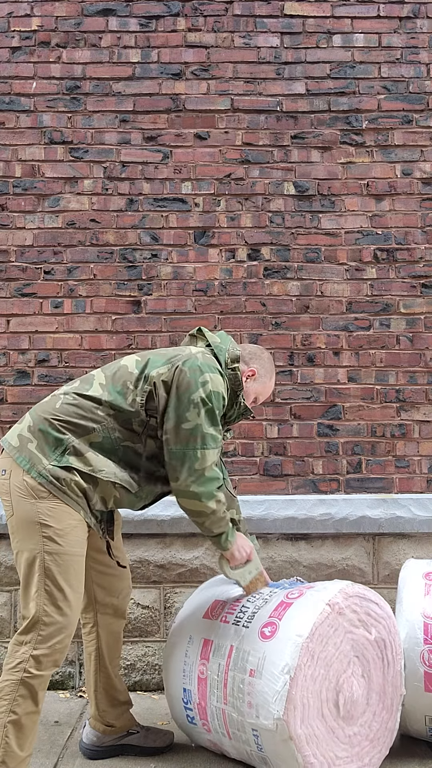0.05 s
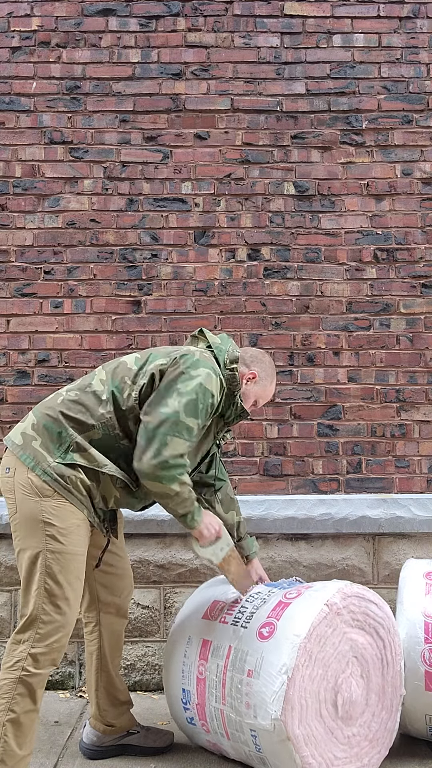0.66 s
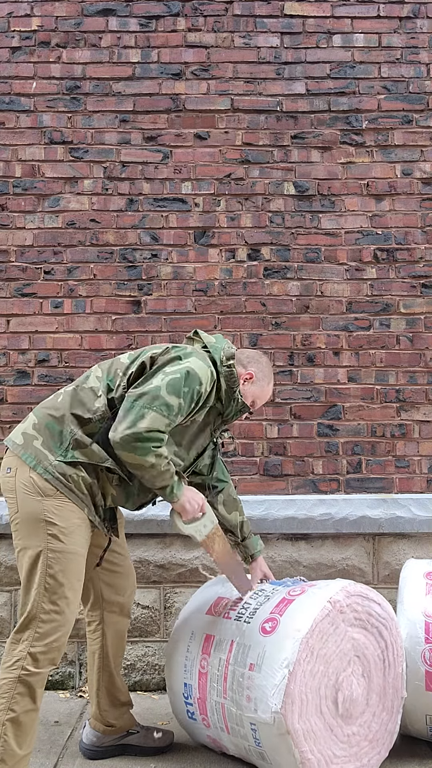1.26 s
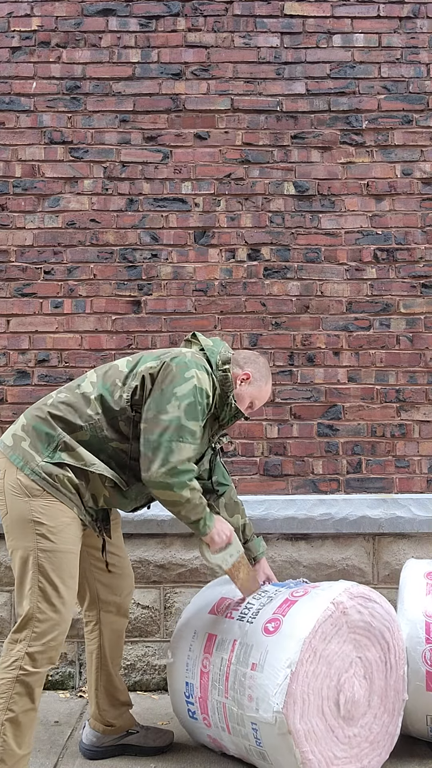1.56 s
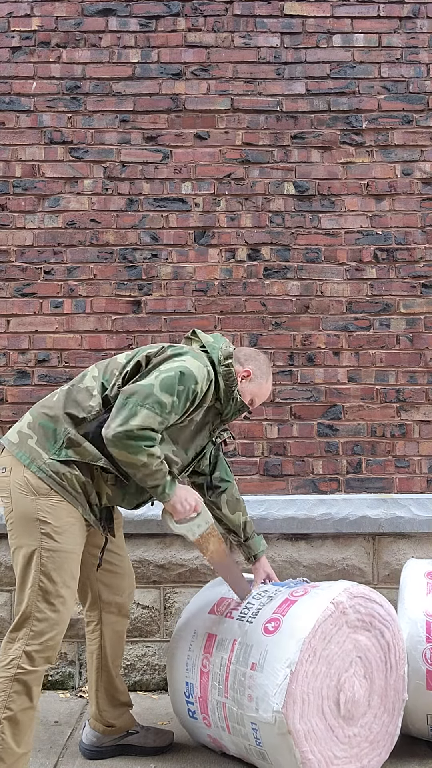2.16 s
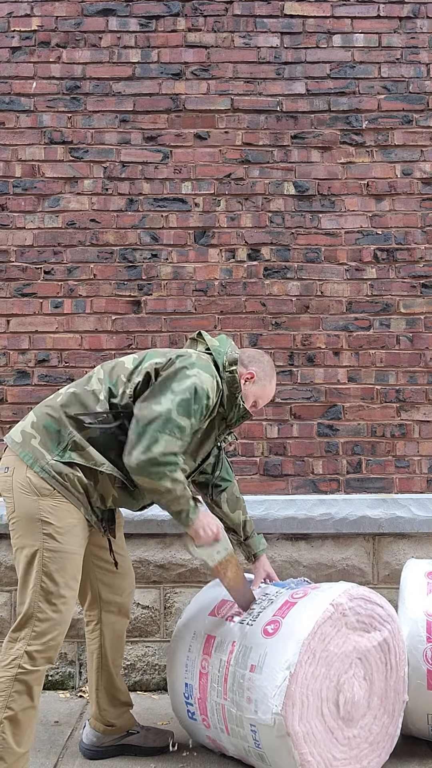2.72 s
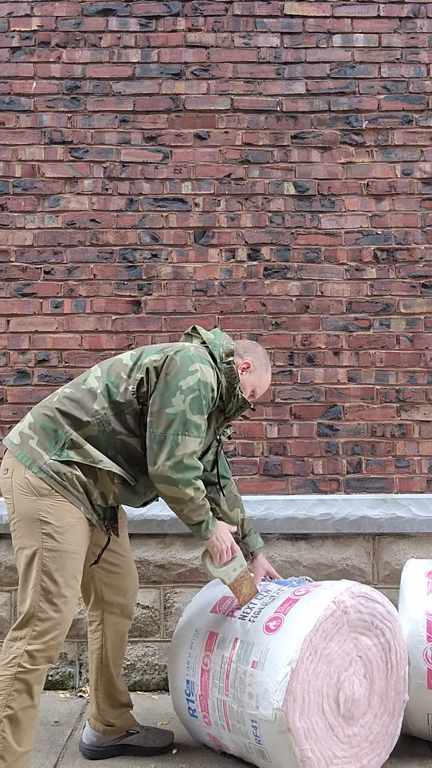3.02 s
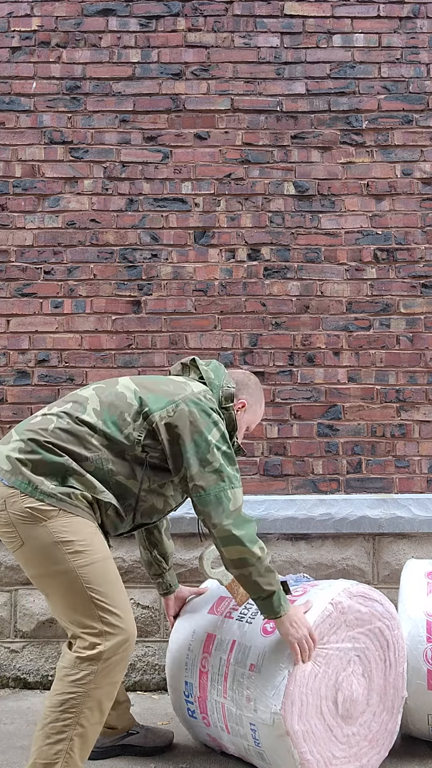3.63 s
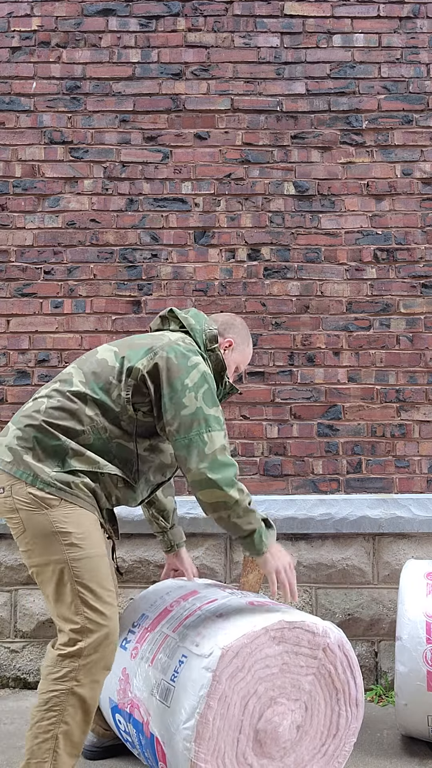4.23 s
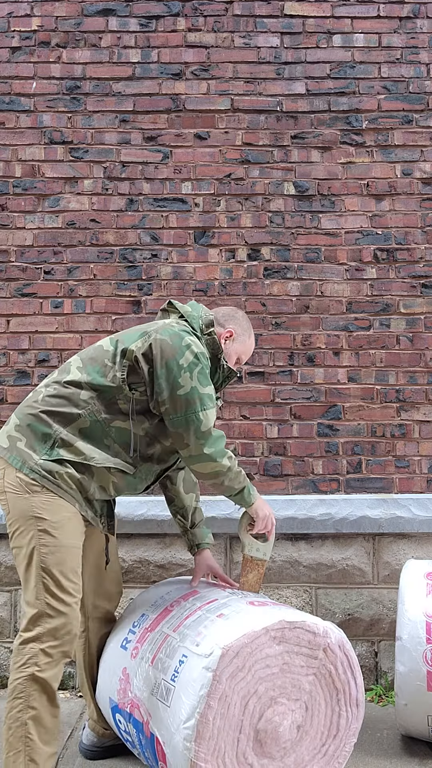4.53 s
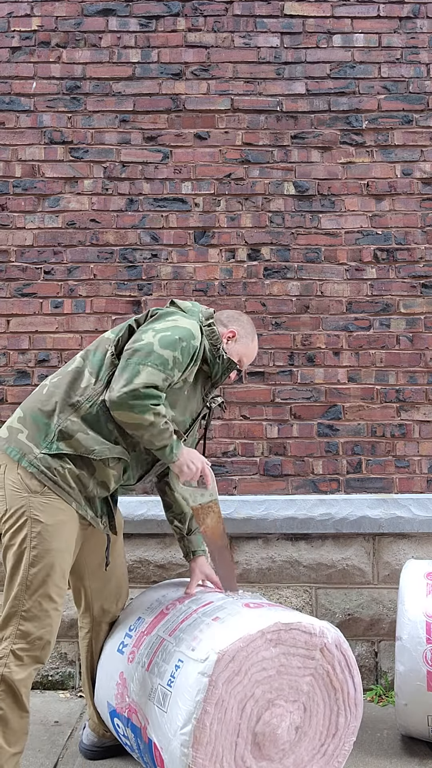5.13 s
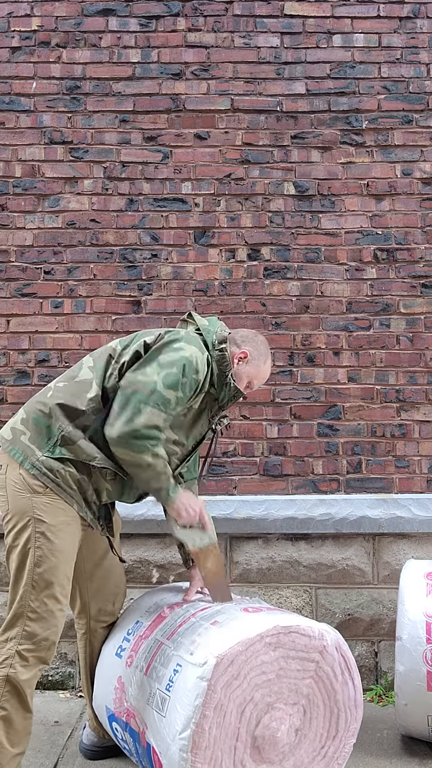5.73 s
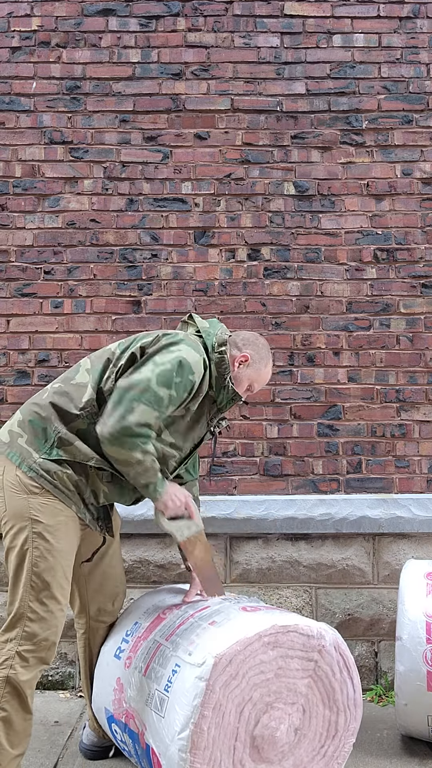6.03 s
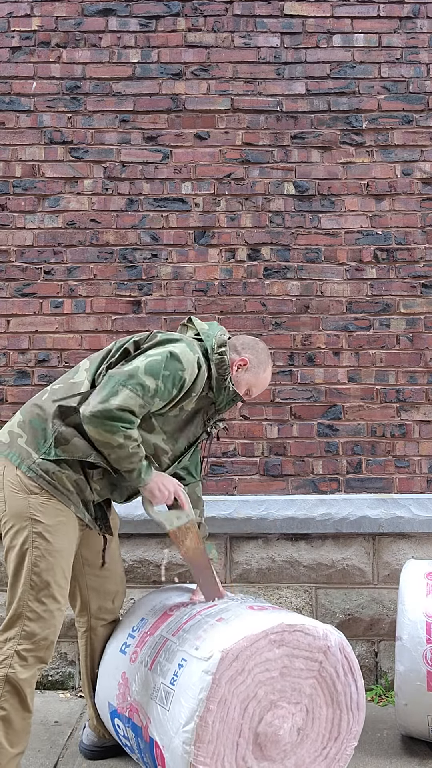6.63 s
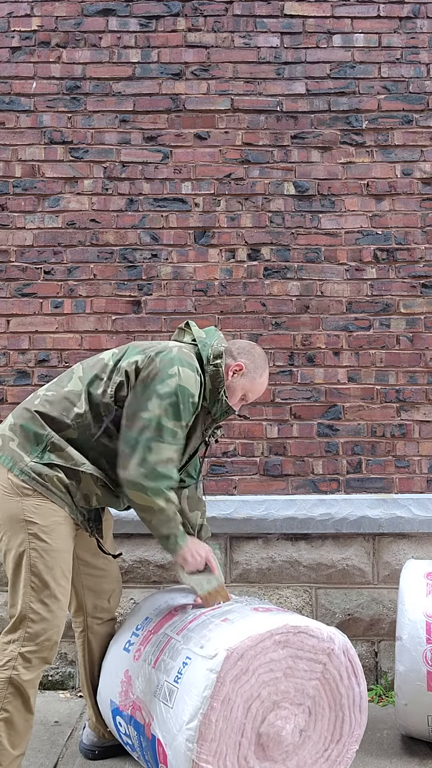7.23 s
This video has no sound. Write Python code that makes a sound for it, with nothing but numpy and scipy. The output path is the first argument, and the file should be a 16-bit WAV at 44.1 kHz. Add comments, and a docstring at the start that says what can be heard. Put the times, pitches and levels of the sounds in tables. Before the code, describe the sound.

From the start, a hand saw cuts through a plastic-wrapped roll of glass wool, about two back-and-forth cycles a second. Each push is a bright rasp with a short buzz that follows the blade's speed. Each return sticks and slips with a low groan. The wrap gives small sharp cracks, and the soft roll shudders and thuds underneath. At about 3 seconds the sawing stops. The roll is turned with light crinkling and hollow rubbing, loudest at about 4.1 seconds, and the plastic gives one short, slightly falling squeak near 4.7 seconds. At about 5 seconds the sawing resumes at the same pace, buzzing more clearly, with rougher groans near 6.6 and 7.1 seconds, and continues to the end at about 7.5 seconds. The stereo microphone catches the direct sound, short reflections off paving and brick, and faint distant traffic throughout.

```python
"""A hand saw cuts through a plastic-wrapped roll of glass wool, out in a yard facing a brick wall.
The teeth rasp on the wrap and buzz with the speed of each stroke, the roll shudders, and the returning
blade sticks and slips so that it groans. Halfway the sawing stops, the roll is turned with a rustle and
a squeak of plastic, and the sawing goes on. A stereo microphone takes the direct sound, the scatter off
paving and brick, and faint traffic in the distance."""
import sys
import numpy as np
from scipy import signal
from scipy.fft import rfft, irfft, next_fast_len
from scipy.io import wavfile
from scipy.ndimage import uniform_filter1d

SR = 44100
rng = np.random.default_rng(int(sys.argv[2]) if len(sys.argv) > 2 else 0)


def unload_wav(signal):
    """Save mono or channel-first audio to the path in sys.argv[1] as 16-bit WAV at rate SR, clipped to [-1, 1]."""
    wavfile.write(
        sys.argv[1],
        SR,
        np.round(np.clip(np.atleast_2d(signal).T, -1, 1) * 32767).astype(np.int16),
    )


N = 325017
T = np.arange(N) / SR
MOMENTS = T[::64]  # coarse clock for the gestures
SIZE = next_fast_len(N + SR, real=True)
FREQ = np.arange(SIZE // 2 + 1) * SR / SIZE

# Cutting strokes. Each row: start, fastest moment, end and hardest tug in seconds; catch, rasp, bite,
# low modes and upper modes in dB; lowest mode and top tooth rate in Hz; hum in dB.
PUSHES = [(0.0, 0.075, 0.173, .05, -39, -33.5, -19.5, -15, -25, 60.18, 345, -24),
          (0.448, .538, 0.657, 0.53, -38, -31, -23.5, -20, -29, 68.02, 417, -21),
          (0.944, 1.049, 1.151, 1.05, -38, -31, -21, -21, -28, 59.14, 335, -22),
          (1.424, 1.474, 1.615, 1.44, -46, -36, -39, -25, -30, 71.73, 250, -45),
          (1.856, 1.925, 2.053, 1.93, -45.5, -31, -24.5, -21, -27.5, 59.73, 480, -24.5),
          (2.313, 2.404, 2.517, 2.385, -37, -28, -23.5, -19.5, -26.5, 65.5, 476, -26),
          (2.796, 2.878, 2.993, 2.84, -38.5, -30, -27, -19.5, -23, 73.92, 315, -30),
          (5.281, 5.378, 5.481, 5.305, -44, -27.5, -20, -29.5, -26.5, 59.54, 422, -19.5),
          (5.78, 5.863, 5.9873, 5.8, -59, -26.5, -20.5, -38, -27.5, 60.67, 452, -27.5),
          (6.277, 6.352, 6.474, 6.305, -43.5, -29.5, -19, -29.5, -26.5, 60.98, 483, -24),
          (6.752, 6.833, 6.949, 6.78, -42, -28.5, -19, -21.5, -25.5, 61.71, 458, -23),
          (7.229, 7.321, 7.41, 7.262, -48, -28.5, -23, -21, -26, 62.97, 433, -24.5)]
# Return strokes. Each row: as for a push, without the tooth rate and the hum.
PULLS = [(0.19, .283, 0.423, 0.3113, -35, -35.5, -33.5, -35.5, -27, 77.62),
         (0.664, 0.802, 0.989, 0.7763, -30.5, -40.5, -38, -33.5, -27, 86.48),
         (1.158, 1.281, 1.3975, 1.285, -32, -34, -34.5, -29, -25.5, 81.8),
         (1.661, 1.734, 1.845, 1.75, -34.5, -36, -31, -30.5, -26.5, 83.32),
         (2.067, 2.16, 2.283, 2.186, -29, -35, -31.5, -28.5, -26.5, 65.62),
         (2.544, 2.666, 2.824, 2.64, -29.5, -38.5, -36.5, -40, -30, 72),
         (5.026, 5.099, 5.196, 5.8, -72.5, -35, -33, -32.5, -24, 85.92),
         (5.517, 5.615, 5.739, 5.605, -33.5, -34, -35, -30.5, -28.5, 88.23),
         (6.007, 6.146, 6.244, 6.125, -39, -31, -26.5, -31, -24, 85.47),
         (6.49, 6.586, 6.673, 6.625, -39, -38, -28.5, -30, -23, 61.91),
         (6.946, 7.051, 7.125, 7.06, -38.5, -37.5, -34.5, -23.5, -23.5, 62)]
PUSH_SWING_S, PULL_SWING_S = .205, .235  # time for which the blade runs fast
# Spectra of cracking wrap and of the hollow roll. Each row: frequency in Hz, level in dB.
CRACK_COLOUR = [(200, -20), (800, -10), (1500, -6), (2600, -8), (3900, -0.5), (4500, -10.5), (5600, 0),
                (7600, 0.5), (9000, -7.5), (12000, 0), (16000, -18.5)]
HOLLOW_COLOUR = [(70, -1), (200, 5.5), (300, 2), (390, 4), (480, -1.5), (840, 1.5), (1200, -5), (1500, 0),
                 (2000, 1), (2700, -12), (6000, -21.5)]


def undb(db):
    """Decibels to gain."""
    return 10 ** (np.asarray(db) / 20)


def unit(x):
    """Scale to rms 1."""
    return x / np.sqrt(np.mean(x ** 2))


def even(x, span_s):
    """Hold the rms near 1 over every stretch of span_s; the finer grain stays."""
    return x / np.sqrt(np.abs(uniform_filter1d(x ** 2, max(2, int(span_s * SR)))) + 1e-12)


def loudness(seconds, db):
    """Gain along a level curve; silent outside it."""
    return uniform_filter1d(undb(np.interp(T, seconds, db, left=-100, right=-100)), size=128)


def shape(points):
    """dB at every frequency, from (Hz, dB) points joined on a log axis."""
    hz, db = np.transpose(points)
    return np.interp(np.log(FREQ + 1), np.log(hz), db)


def through(x, response):
    """Filter by a frequency response."""
    return irfft(rfft(x, SIZE) * response, SIZE)[..., :N]


def colour(x, points):
    """Causal filter with the given spectrum."""
    cepstrum = irfft(np.log(undb(shape(points))), SIZE)
    cepstrum[1:SIZE // 2] *= 2
    cepstrum[SIZE // 2 + 1:] = 0
    return through(x, np.exp(rfft(cepstrum)))


def ring(x, modes):
    """Resonances driven side by side."""
    return through(x, sum(undb(db) * 1j * FREQ * width / (hz ** 2 - FREQ ** 2 + 1j * FREQ * width)
                          for hz, width, db in modes))


def grains(rate, spread_db):
    """Tiny ruptures of uneven size at random moments, about rate a second."""
    size = undb(spread_db * np.minimum(rng.exponential(size=N), 5))
    return unit((rng.random(N) < rate / SR) * size * rng.choice([-1, 1], N))


def walk(rate):
    """Smooth random drift of rms 1, with rate changes a second."""
    hold = max(2, int(SR / rate))
    steps = np.repeat(rng.standard_normal(N // hold + 1), hold)
    return unit(uniform_filter1d(steps, hold)[:N])


def pulses(turns):
    """One click at each whole turn, shared between two samples."""
    return np.maximum(0, 1 - np.abs(turns - np.round(turns)) / np.gradient(turns))


def tone(hz):
    """Sine of rms 1 that follows a pitch curve."""
    return np.sqrt(2) * np.sin(2 * np.pi * np.cumsum(hz) / SR)


def apart(pair, join_hz=260):
    """Two unrelated spectra as left and right that merge in the bass."""
    side = pair[1] * FREQ ** 2 / (FREQ ** 2 + join_hz ** 2)
    return np.array([pair[0] + side, pair[0] - side]) / np.sqrt(2)


def combine(gains):
    """Add overlapping gestures by power into one gain for every sample."""
    return np.interp(T, MOMENTS, np.sqrt(np.sum(np.square(gains), axis=0)))


def fade(start, end, attack_s, decay_s):
    """Full between start and end, with an exponential attack before and decay after."""
    return np.exp(-np.maximum(start - MOMENTS, 0) / attack_s - np.maximum(MOMENTS - end, 0) / decay_s)


def swell(start, peak, end, law):
    """Gain through one stroke: it grows to the peak and sinks until the blade turns."""
    start_db, end_db, bend, edge_s = law
    before = np.clip((peak - MOMENTS) / max(peak - start, 1 / SR), 0, 1)
    after = np.clip((MOMENTS - peak) / max(end - peak, 1 / SR), 0, 1)
    return undb(start_db * before ** bend + end_db * after ** bend) * fade(start, end, edge_s, edge_s)


def strokes(push_law, pull_law):
    """Every stroke, paired with the swell law of its direction."""
    return [(row, push_law) for row in PUSHES] + [(row, pull_law) for row in PULLS]


def blade(waver=.025, rest_hz=60, pull_hz=270.28, turned_s=4):
    """The blade speeds up and slows in each stroke: count of teeth passed, and how cleanly they buzz."""
    # Pushes buzz more cleanly once the roll is turned; drawn back, the teeth skid and hardly buzz.
    swings = [(fastest, PUSH_SWING_S, hz, .72 if fastest > turned_s else .45)
              for _, fastest, *_, hz, _ in PUSHES]
    swings += [(fastest, PULL_SWING_S, pull_hz, .285) for _, fastest, *_ in PULLS]
    rate, buzz = np.full(N, float(rest_hz)), np.zeros(N)
    for fastest, length, hz, share in swings:
        speed = np.cos(np.pi * np.clip((T - fastest) / length, -.5, .5))
        rate = np.maximum(rate, hz * speed)
        buzz = np.maximum(buzz, share * speed)
    return np.cumsum(rate * np.exp(waver * walk(250))) / SR, buzz


def ripping(catch_s=.01324, release_s=.0178):
    """How hard the teeth rip: a burst as they catch, then a swell with the speed of the blade."""
    sawing = strokes(push_law=(-17.5, -33.5, 1.5, .022), pull_law=(-16.5, -21.5, 2.7, .038))
    return combine([undb(catch_db) * fade(start, start + catch_s, catch_s, release_s)
                    + undb(rasp_db) * swell(start, fastest, end, law)
                    for (start, fastest, end, _, catch_db, rasp_db, *_), law in sawing])


def jolts(hold_s=.028):
    """The teeth suddenly dig in during a push: gains of their bite and of the roll's thud."""
    # Each row: start in seconds, bite in dB, thud in dB.
    digs = [(.52, -19, -16), (1.034, -20, -20), (1.911, -20, -23), (2.385, -21, -23), (2.868, -22, -21),
            (5.375, -23, -34), (6.325, -22, -34)]
    seconds, bite_db, thud_db = np.transpose(digs)
    bursts = np.array([fade(s, s + hold_s, attack_s=.003, decay_s=.014) for s in seconds])
    return combine(undb(bite_db)[:, None] * bursts), combine(undb(thud_db)[:, None] * bursts)


def rasp(teeth, depth=.235):
    """Glass fibres and film snap in clumps against the ringing steel, in a burst at each tooth."""
    # Spectrum of the steel. Each row: frequency in Hz, level in dB.
    rasp_colour = [(1200, 2), (2500, -8), (3200, -.5), (3900, 8.5), (4350, -2.5), (5000, 1.5), (5550, 5),
                   (6300, -3), (7500, 3), (8900, -11.5), (10800, -6), (11900, -0.5), (14000, -10),
                   (16000, -14)]
    bursts = 1 + depth * np.cos(2 * np.pi * teeth)
    clumps = undb(2.7 * walk(130))
    snapping = grains(rate=5000, spread_db=-1.5) * bursts * clumps
    return even(colour(snapping, rasp_colour), .0357) * ripping() * undb(2.2)


def crackle():
    """Lone sharp pops as single threads of the wrap part."""
    return colour(grains(rate=70, spread_db=3.5), CRACK_COLOUR) * ripping() * undb(-1.5)


def scrape(teeth, buzz):
    """Each tooth plucks the taut wrap and the wool tears at random, most where the blade runs fastest."""
    # Spectrum of the bite. Each row: frequency in Hz, level in dB.
    bite_colour = [(120, -13), (230, -5.5), (320, -1.5), (430, -2), (540, -2.5), (660, 1.5), (860, 1.5),
                   (1050, -3), (1300, -5.5), (1500, 1), (1850, -5), (2150, -5), (2600, -18), (5000, -23)]
    plucks = even(colour(pulses(teeth) * undb(3.44 * walk(400)), bite_colour), .0128)
    tearing = even(colour(grains(rate=1100, spread_db=2.5), bite_colour), .058)
    sawing = strokes(push_law=(-23.5, -30.5, 1.488, .2287), pull_law=(-13.5, -19, 1.32, .2719))
    bite = combine([undb(bite_db) * swell(start, fastest, end, law)
                    for (start, fastest, end, _, _, _, bite_db, *_), law in sawing])
    dig, _ = jolts()
    return (np.sqrt(buzz) * plucks + np.sqrt(1 - buzz) * tearing) * np.hypot(bite, dig) * undb(-1.4)


def dragging(push_law, pull_law, column, grip_db=2.5):
    """How hard the blade drags the roll, from one level column of the strokes; the wool grips unevenly."""
    tugs = []
    for row, law in strokes(push_law, pull_law):
        start, _, end, hardest, *_ = row
        tugs.append(undb(row[column]) * swell(start, hardest, end, law))
    return combine(tugs) * undb(grip_db * walk(18))


def shudder(waver=.0595, low_tugs_db=-6):
    """Dragged by the blade or shifted by hand, the soft roll shudders, and random tugs knock its modes."""
    # Low and upper modes of the roll. Each row: frequency in Hz, width in Hz, level in dB.
    low_modes = [(45.3, 42, -37), (55.7, 7.5, -5.5), (87.1, 82.5, -6)]
    high_modes = [(119.7, 43.6, 1), (172, 77.4, -0.5), (232, 15.5, -10.5)]
    # Shifting and steadying the roll between the cuts. Each row: time in seconds, level in dB.
    shifts = [(2.98, -53.5), (3.1, -47.5), (3.2, -46.5), (3.33, -53), (3.65, -60.5), (3.83, -41.5),
              (4.03, -70.5), (4.13, -42.5), (4.3, -50.5), (4.83, -64.5), (4.9, -47), (5.05, -31.5)]
    low = ring(grains(rate=250, spread_db=.5), low_modes)
    low = colour(low, [(25, -14), (50, -3), (90, -2), (200, -18.5)])
    high = ring(grains(rate=400, spread_db=2.5), high_modes)
    high = colour(high, [(55, -19.5), (110, 1.5), (280, 1.5), (600, -13)])
    # The lowest mode is mostly slack on a push, stiffer when the pulled blade lifts the wrap.
    tug_s, mode_hz = np.transpose(sorted((row[3], row[9]) for row in PUSHES + PULLS))
    swing = tone(np.interp(T, tug_s, mode_hz) * np.exp(waver * walk(60)))
    low = even(swing + undb(low_tugs_db) * even(low, .0382), .054)
    low_drag = dragging((-12, -20.5, 1.33, .2575), (-14, -14, 2.25, .0653), column=7)
    high_drag = dragging((-4.5, -10, 2, .0006), (-14, -12.5, 1.55, .1072), column=8)
    shifting = loudness(*np.transpose(shifts))
    _, thud = jolts()
    return (low * (low_drag + thud + shifting) * undb(-.5)
            + even(high, .043) * (high_drag + shifting) * undb(-2.5))


def traffic(level_db=-51.5, swell_db=2.35):
    """Distant traffic beyond the yard, swelling a little."""
    # Its spectrum at the microphone. Each row: frequency in Hz, level in dB.
    traffic_colour = [(15, -35.5), (25, 3.5), (74, -1), (451, -20.5), (1440, -16.5), (2160, -20.5),
                      (2610, -30.5), (3820, -18.5), (4370, -23), (7310, -24.5), (9070, -34), (12500, -27),
                      (16000, -41)]
    spectra = apart(rfft(rng.standard_normal((2, N)), SIZE))
    air = irfft(spectra * undb(shape(traffic_colour)), SIZE)[:, :N]
    return unit(air) * undb(level_db + swell_db * walk(2.427))


def snaps(crack_s=.000505, crumple_s=.0347):
    """A snag lets go: a sharp crack, a short crumple of film and a knock from the roll."""
    # Each row: start in seconds, level in dB, then knock and crumple in dB against the crack.
    snags = [(0.0218, -22.5, 18.5, -12.5), (0.1992, -14.5, -14, -22), (0.4412, -21, -8.5, -15),
             (0.523, -15.5, 11.5, -19.5), (0.6758, -8.5, -21.5, -16.5), (0.9223, -6.5, 4.5, -33.5),
             (0.943, -22, 9, -23), (1.1713, -2, -20.5, -16.5), (1.4265, -18.5, -3.5, -8.5),
             (1.6316, -24, 5.5, -10), (1.6623, -8.5, -2, -17.5), (1.9114, -15, 11, -12.5),
             (2.063, -9, -12, -15), (2.096, -4, -13.5, -14), (2.317, -17, 5.5, -6.5),
             (2.5524, -3.5, -4, -22.5), (2.8041, -12, 8.5, -18), (3.04, 0.5, -29.5, -30.5),
             (3.1812, -8.5, -11.5, -20), (3.562, -40, 12, -15.5), (3.583, -39, 14.5, -15),
             (3.912, -40, 10.5, -12.5), (4.109, -12, -23, -5.5), (4.447, -35, 8.5, -16),
             (4.611, -32, 12, -16), (4.6393, -29, 5, -16), (4.8528, -14.5, -7, -25),
             (4.9156, -13, -16.5, -15), (4.9513, -1, -30, -27), (5.0801, -16.5, -5.5, -19),
             (5.103, -12.5, -14.5, -12), (5.1584, -12.5, -5.5, -20.5), (5.2786, -16, 2.5, -15.5),
             (5.3432, -12, 3.5, -21.5), (5.5085, -9, -2, -13.5), (5.5217, -5, -9, -21),
             (5.602, -4, -27, -11), (5.6332, -4, -23.5, -23), (5.6532, -4, -26, -19),
             (6.0125, -6.5, -22.5, -22), (6.2701, -16, -2.5, -15), (6.7504, -17.5, -9.5, -10.5),
             (6.9534, -8.5, -30, -11)]
    crack, knock = np.zeros(N), np.zeros(N)
    t = T[:SR // 10]
    for start, db, knock_db, crumple_db in snags:
        at = slice(int(start * SR), int(start * SR) + len(t))
        envelope = np.exp(-t / crack_s) + undb(crumple_db) * np.exp(-t / crumple_s)
        burst = rng.standard_normal(len(t)) * envelope * undb(db) / 2
        crack[at] += burst
        knock[at] += burst * undb(knock_db)
    return undb(3.5) * colour(crack, CRACK_COLOUR) + undb(5) * colour(knock, HOLLOW_COLOUR)


def hum(attack_s=.0245, linger_s=.055, sag_per_s=.512, waver=.01164):
    """A hum rises with the tooth rate on each push, then lingers briefly, sagging in pitch."""
    out = np.zeros(N)
    wobble = np.exp(waver * walk(120))
    for _, fastest, *_, hz, db in PUSHES:
        near = np.abs(T - fastest) < .25
        t = T[near] - fastest
        pitch = hz * np.where(t < 0, np.cos(np.pi * t / PUSH_SWING_S), 1 - sag_per_s * t) * wobble[near]
        envelope = np.exp(-np.abs(t / np.where(t < 0, attack_s, linger_s)) ** 1.187)
        out[near] += undb(db) * envelope * tone(pitch)
    return out


def groan(waver=.035, scatter_db=2.25):
    """The returning blade sticks and slips in the wool; under load every other slip is weak."""
    # Each row: start, peak and end in seconds, slip rate in Hz at those three moments, level in dB,
    # unevenness of alternate slips from 0 to 1.
    groans = [(0.209, 0.301, 0.3963, 128.1, 121.8, 85.06, -21.5, 0.134),
              (0.731, 0.761, 0.841, 105, 95.71, 77.99, -22, 0.095),
              (1.251, 1.291, 1.408, 102, 90.02, 67.98, -20.5, 0.1043),
              (1.67, 1.751, 1.783, 94.8, 124.1, 94.82, -20, 0.19),
              (2.109, 2.239, 2.285, 78.09, 118.2, 113.8, -22, 0.31),
              (2.57, 2.65, 2.713, 110.3, 121, 104, -25, 0.1578),
              (4.999, 5.1, 5.225, 110.1, 169.9, 75, -26.5, 0.22),
              (5.502, 5.592, 5.72, 112.4, 116.2, 108.2, -25.5, .25),
              (6.039, 6.1, 6.217, 75.18, 125.8, 98.07, -24.5, 0.1547),
              (6.511, 6.66, 6.68, 112.2, 122.9, 122, -16.5, 0.647),
              (6.989, 7.08, 7.247, 110.2, 123.3, 121.9, -16.5, 0.738)]
    # Spectrum of the groaning roll. Each row: frequency in Hz, level in dB.
    groan_colour = [(25, -36.5), (55, 4.5), (125, 1.5), (240, -12.5), (370, -21), (700, -39), (2000, -75)]
    rows = np.array(groans)
    rate = np.interp(T, rows[:, :3].ravel(), rows[:, 3:6].ravel()) * np.exp(waver * walk(70))
    turns = np.cumsum(rate) / SR
    strong_weak = 1 + np.interp(T, rows[:, 1], rows[:, 7]) * np.cos(np.pi * turns)
    slips = colour(pulses(turns) * strong_weak * undb(scatter_db * walk(150)), groan_colour)
    gain = combine([undb(db) * swell(start, peak, end, law=(-10.5, -11.5, 1.57, .0866))
                    for start, peak, end, *_, db, _ in groans])
    return even(slips, .0488) * gain


def handling():
    """Hands and blade slide over the wrap as the roll is turned: fine crinkle over a hollow rub."""
    # Each row: loudest moment, rise and decay in seconds, swish in dB, hollow body in dB.
    rubs = [(3.288, 0.021, 0.0308, -49.5, -48.5), (3.381, 0.0025, 0.0099, -42, -41),
            (3.5, 0.034, 0.053, -58, -53), (3.668, 0.00744, 0.0094, -47.5, -43.5),
            (3.774, 0.0032, 0.0129, -40, -44), (3.811, 0.0325, 0.0385, -37.5, -35),
            (3.965, 0.0216, 0.0325, -64, -44), (4.08, 0.0184, 0.022, -38, -43),
            (4.128, 0.0114, 0.0257, -21, -20.5), (4.22, .03, 0.15, -53, -44),
            (4.32, 0.0134, 0.0059, -42.5, -54.5), (4.464, 0.009, .008, -57.5, -48),
            (4.639, 0.0183, 0.0286, -44, -44), (4.864, 0.00816, 0.084, -40, -41.5),
            (4.96, 0.0254, 0.0715, -43.5, -50.5)]
    # Spectrum of the crinkling film. Each row: frequency in Hz, level in dB.
    swish_colour = [(1200, -27), (2600, -10), (3300, 4), (5500, 0.5), (7600, 1), (9200, -10.5), (12000, -1),
                    (16000, -16)]
    swish = even(colour(grains(rate=5000, spread_db=1), swish_colour), .05)
    swish *= combine([undb(db) * fade(s, s, rise, decay) for s, rise, decay, db, _ in rubs])
    hollow = even(colour(grains(rate=1200, spread_db=3.5), HOLLOW_COLOUR), .11)
    hollow *= combine([undb(db) * fade(s, s, rise, decay) for s, rise, decay, _, db in rubs])
    return undb(.58) * swish + undb(.1) * hollow


def squeak(rough=.051, hiss=1.34):
    """Film sticks and slips quickly under a hand, falling in pitch."""
    # Each row: time in seconds, slip rate in Hz, level in dB.
    glide = [(4.692, 1197, -48), (4.696, 1174, -30), (4.711, 1103, -30.5), (4.726, 1050, -32.5),
             (4.734, 982, -59)]
    # Spectrum of the squeaking film. Each row: frequency in Hz, level in dB.
    squeak_colour = [(300, -11.5), (1150, -12), (2300, -3.5), (3300, 2), (4400, -4), (5600, -6.5),
                     (8000, -10.5), (15000, -19)]
    seconds, hz, db = np.transpose(glide)
    rate = np.interp(T, seconds, hz) * np.exp(rough * walk(900))
    friction = unit(pulses(np.cumsum(rate) / SR)) + hiss * rng.standard_normal(N)
    return unit(colour(friction, squeak_colour)) * loudness(seconds, db) * undb(3.5)


def direct_path():
    """Straight to the microphone: the right port hears the treble sooner, the bass reaches both alike."""
    # Each row: frequency in Hz, lag of the left port in radians.
    port_lag = [(50, 0.1542), (200, 0.1818), (450, 0), (950, 0.775), (1700, 3), (2400, 4), (4500, 4),
                (5200, 5.5), (6100, 7), (6800, 8.5), (7500, 12.5), (8000, 12.5), (9000, 19.5), (10000, 22),
                (11800, 19.5), (13000, 23)]
    lag = np.interp(FREQ, *np.transpose(port_lag))
    return np.exp(-1j * lag * np.array([[1], [0]]))


def walls(scatter_s=.0055, echo_s=.035, echo_width_s=.022, t60_s=.36, damping_hz=8500):
    """Paving and brick scatter at once; the facing wall answers later and duller; the yard rings on."""
    t = T[:SR // 2]
    parts = [(-2.5, np.exp(-t / scatter_s)),
             (-12, np.exp(-np.abs(t - echo_s) / echo_width_s)),
             (-12, np.exp(-np.log(1000) * t / t60_s))]
    scatter, echo, tail = (undb(db) * envelope / np.linalg.norm(envelope) for db, envelope in parts)
    early, late = rng.standard_normal((2, 2, len(t)))
    late = signal.lfilter(*signal.butter(1, damping_hz, fs=SR), late)
    thin_bass = undb(shape([(80, -18), (400, -3), (1500, 0), (8000, 1.5)]))
    return apart(rfft(early * scatter + late * np.hypot(echo, tail), SIZE)) * thin_bass


def yard(x, teeth, teeth_per_turn=60):
    """At the microphone: direct sound and two sets of reflections trading places as the blade travels."""
    # Balance of the microphone ports. Each row: frequency in Hz, left minus right in dB.
    port_balance = [(250, -0.5), (400, 1.04), (600, 4), (1100, 3.5), (1280, 7), (1500, 2.5), (2200, 5.5),
                    (2550, -1), (3400, 1), (3750, 7), (4200, .5), (6300, 2.5), (8500, -3), (11800, -12),
                    (15000, -2)]
    direct, first, second = direct_path(), walls(), walls()
    turn = 2 * np.pi * teeth / teeth_per_turn
    # The open yard ripples the spectrum finely but favours no broad band.
    power = np.abs(direct) ** 2 + (np.abs(first) ** 2 + np.abs(second) ** 2) / 2
    balance = undb(np.array([[.5], [-.5]]) * shape(port_balance))
    gain = balance / np.sqrt(np.mean(balance ** 2, axis=0) * uniform_filter1d(power, size=SIZE // 400))
    straight, one, other = rfft([x, x * np.cos(turn), x * np.sin(turn)], SIZE)
    return irfft(gain * (direct * straight + first * one + second * other), SIZE)[:, :N]


def scene():
    """Saw, roll and wrap in the yard, over distant traffic."""
    teeth, buzz = blade()
    saw = scrape(teeth, buzz) + hum() + rasp(teeth) + crackle()
    roll = groan() + shudder() + snaps() + handling() + squeak()
    return undb(.1829) * yard(saw + roll, teeth) + traffic()


def record(dry, low_cut_hz=32, top_hz=16000):
    """The phone's microphone cuts the deepest rumble and the top."""
    dry = signal.sosfilt(signal.butter(2, low_cut_hz, "high", fs=SR, output="sos"), dry)
    return signal.sosfilt(signal.ellip(10, .2, 70, top_hz, fs=SR, output="sos"), dry)


dry = scene()
out = record(dry)
unload_wav(out)
```